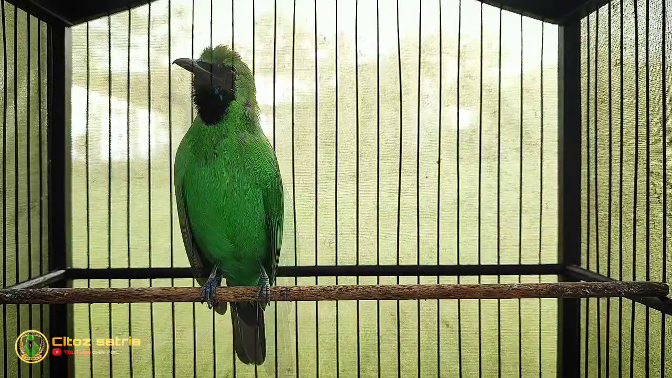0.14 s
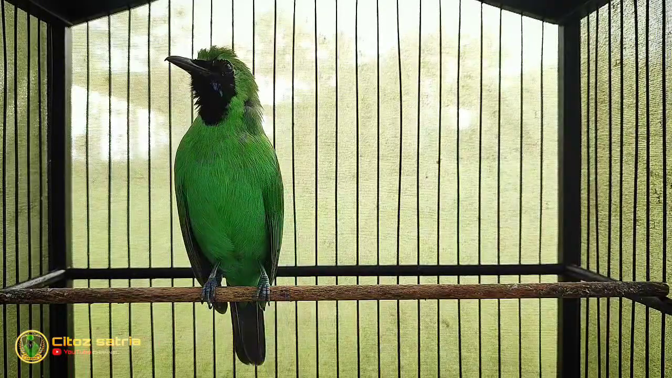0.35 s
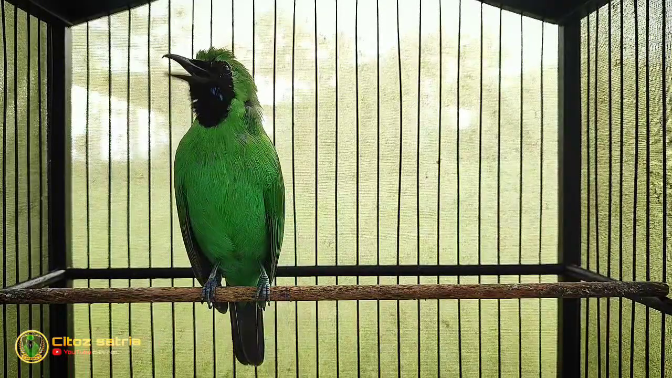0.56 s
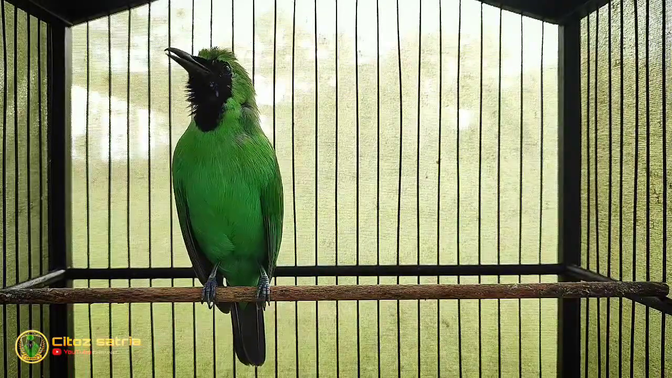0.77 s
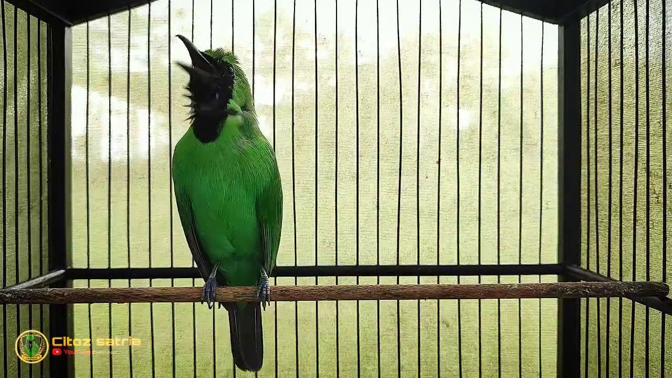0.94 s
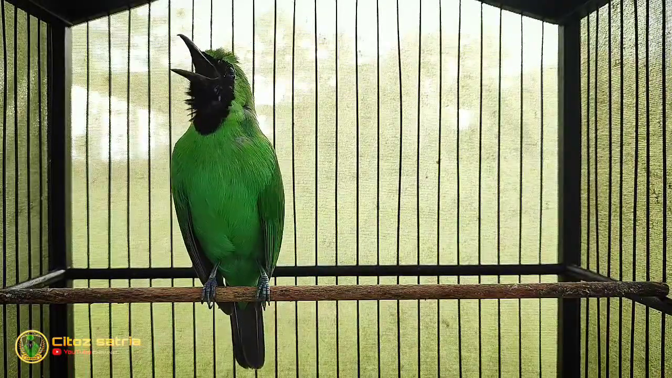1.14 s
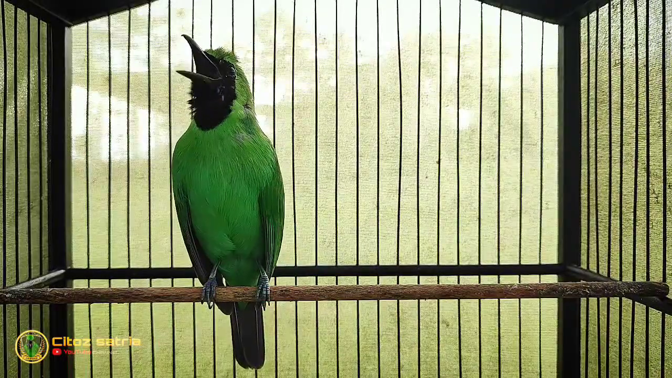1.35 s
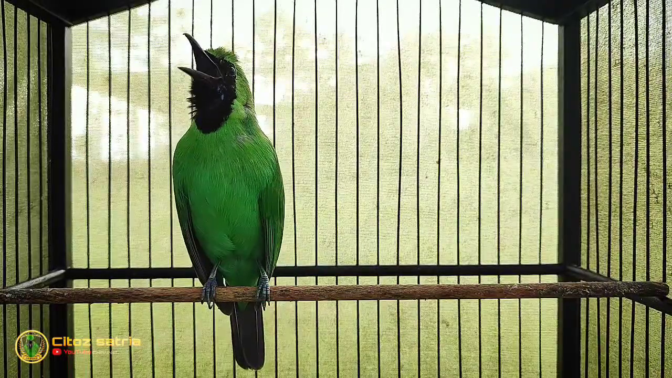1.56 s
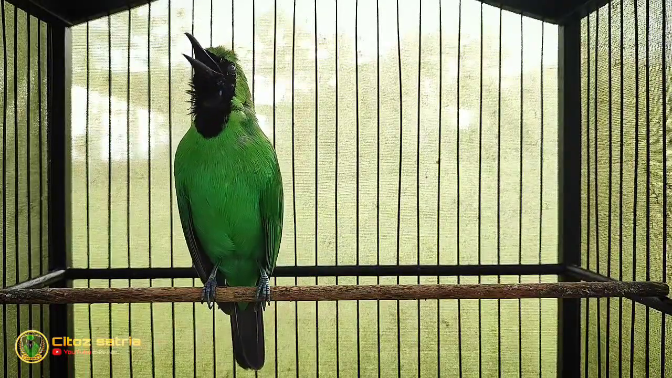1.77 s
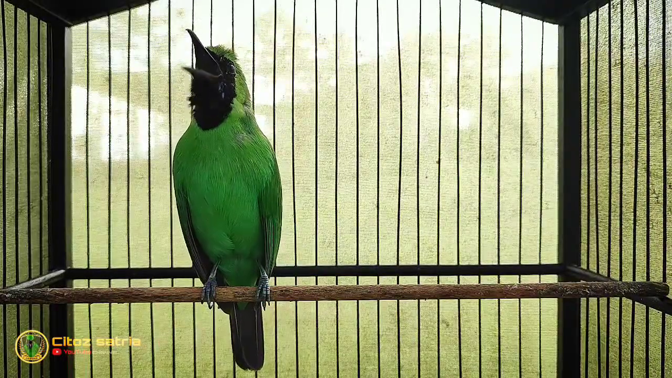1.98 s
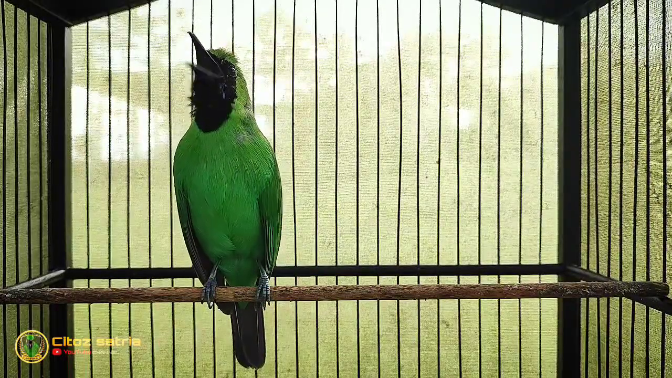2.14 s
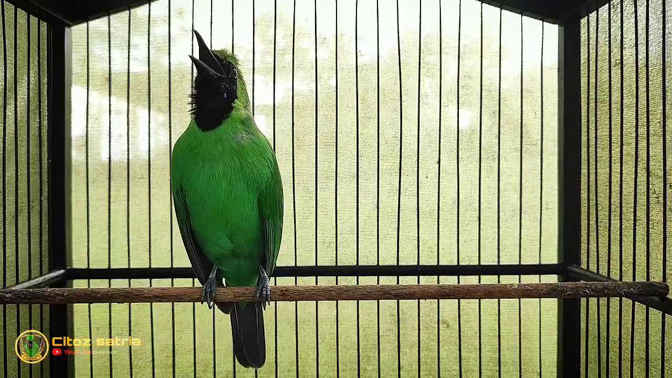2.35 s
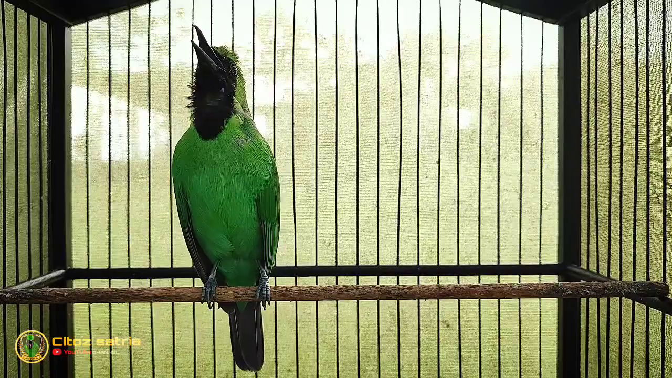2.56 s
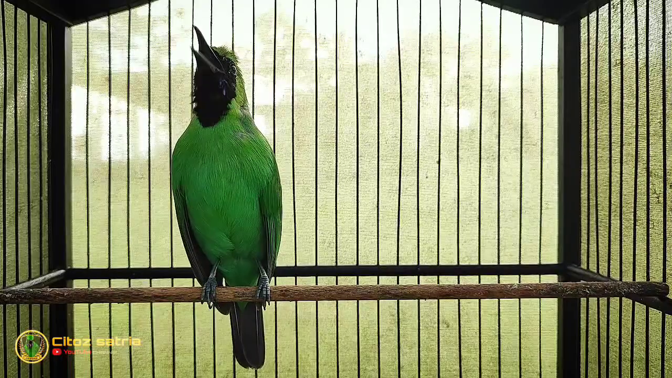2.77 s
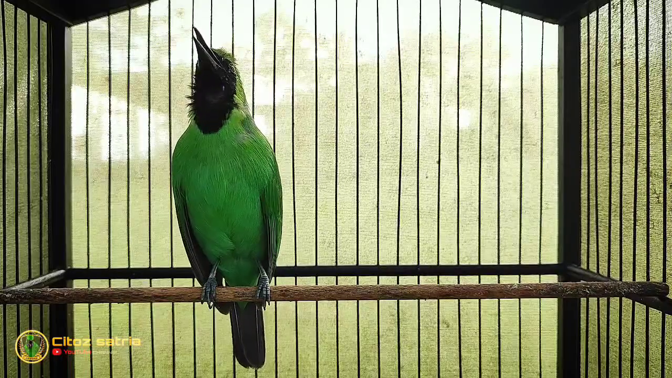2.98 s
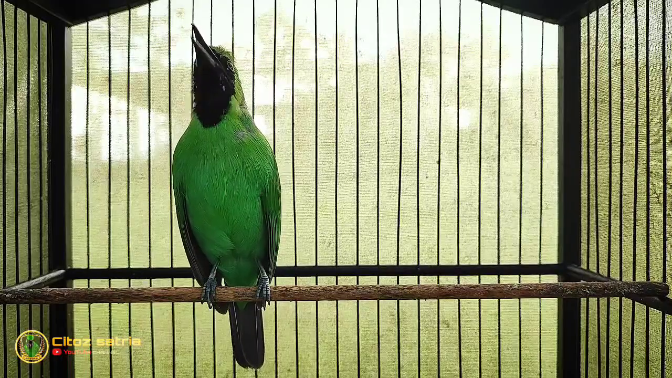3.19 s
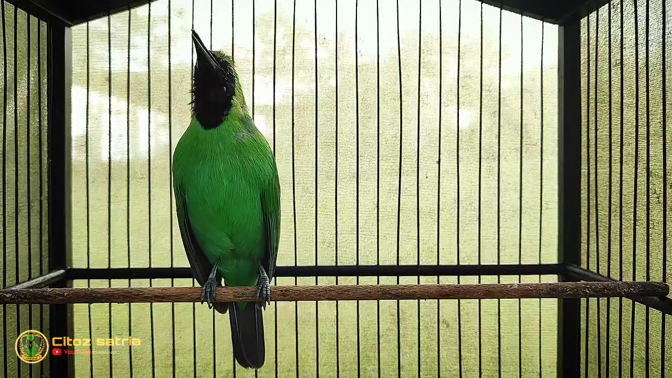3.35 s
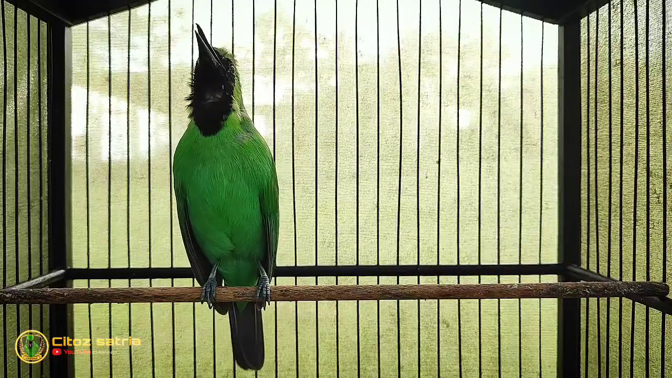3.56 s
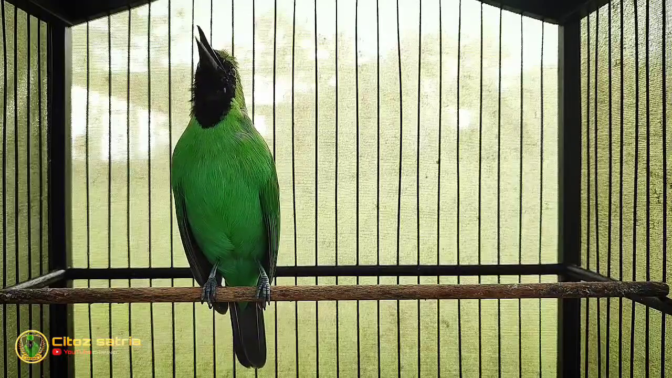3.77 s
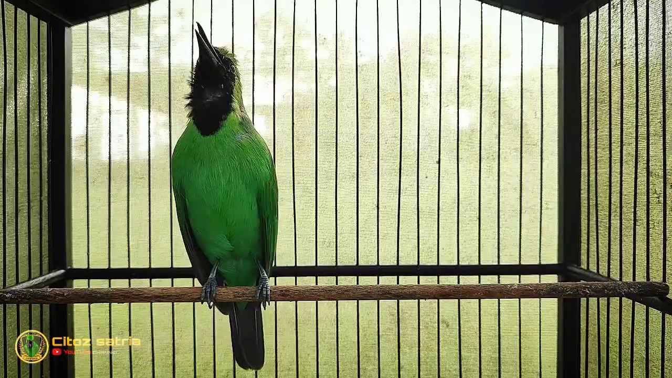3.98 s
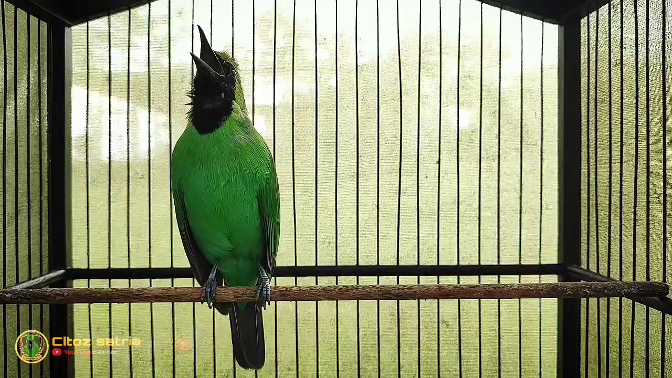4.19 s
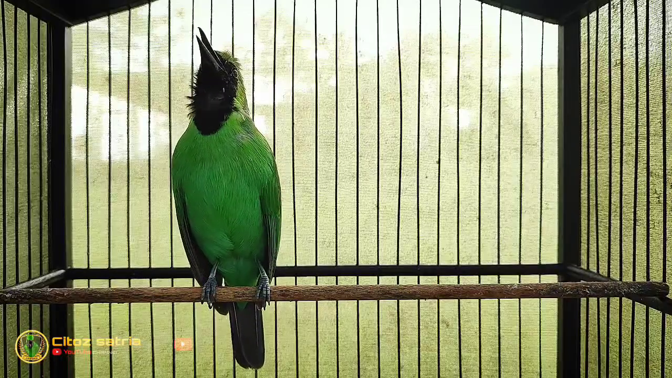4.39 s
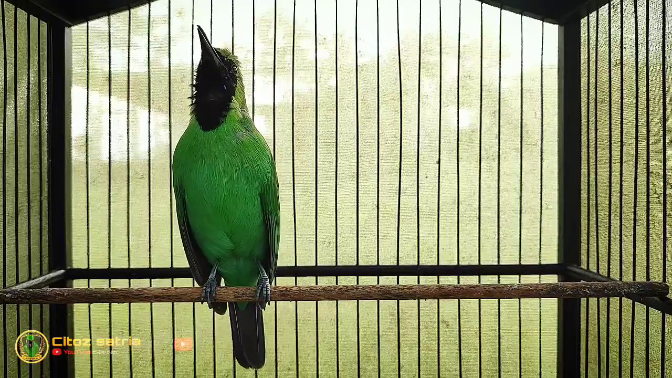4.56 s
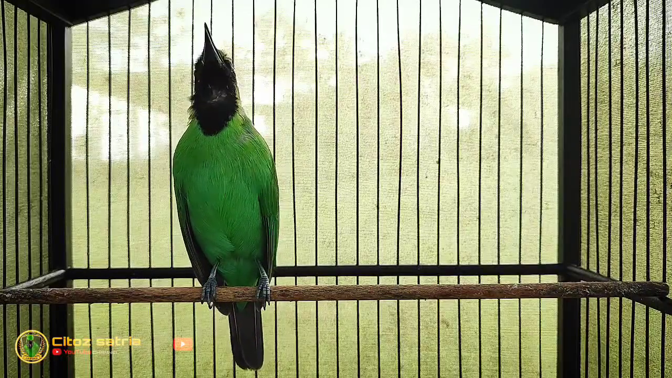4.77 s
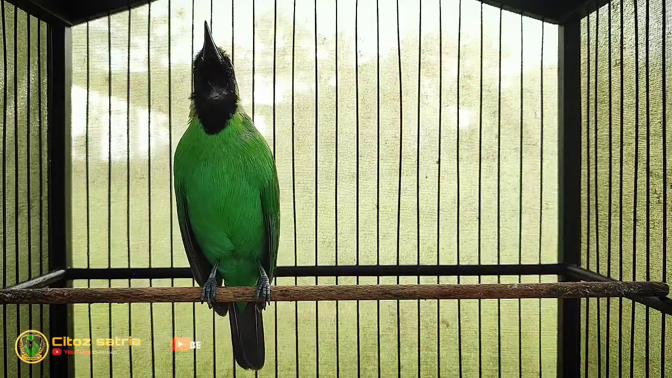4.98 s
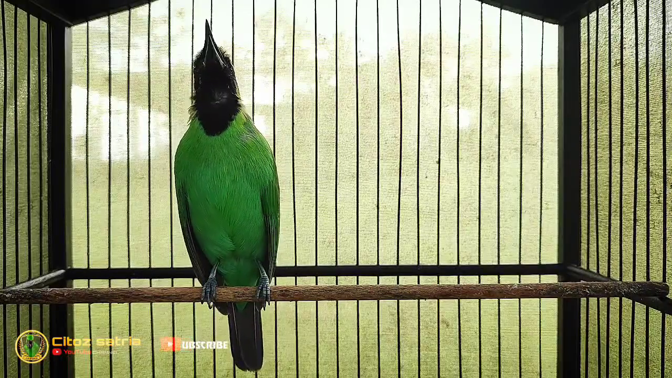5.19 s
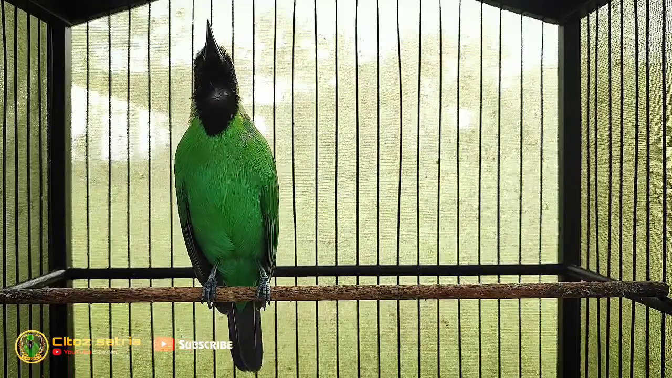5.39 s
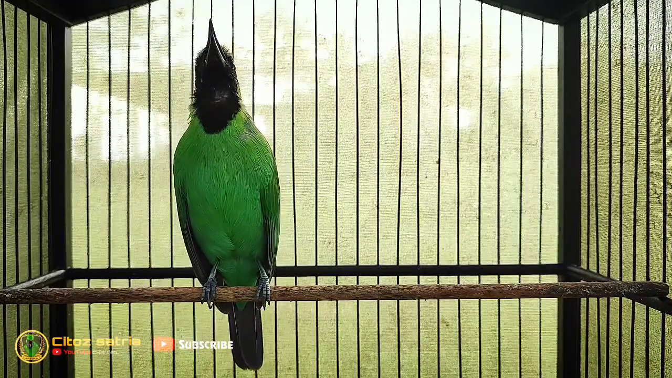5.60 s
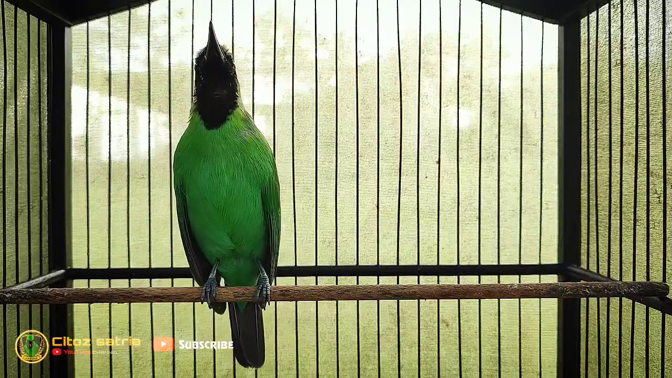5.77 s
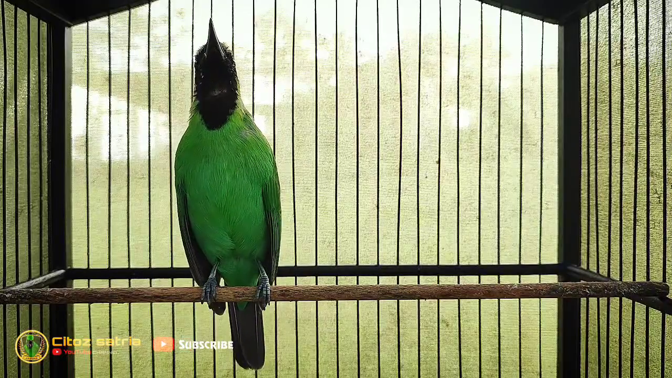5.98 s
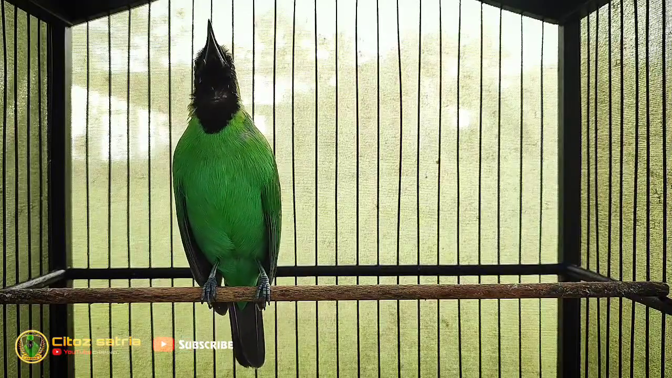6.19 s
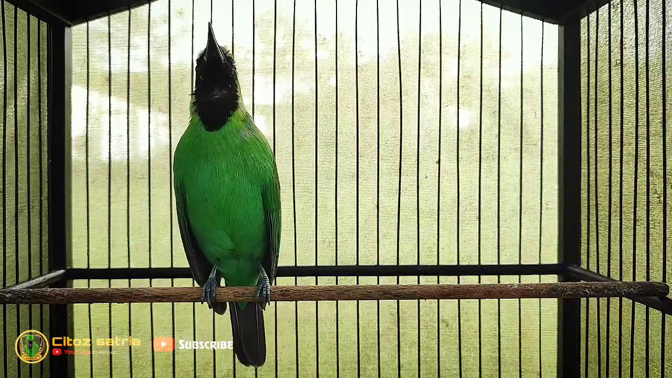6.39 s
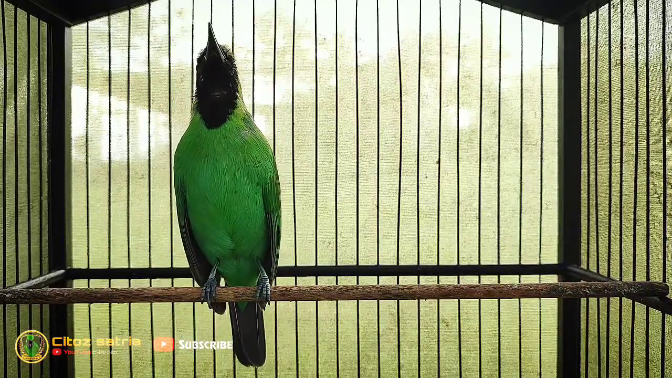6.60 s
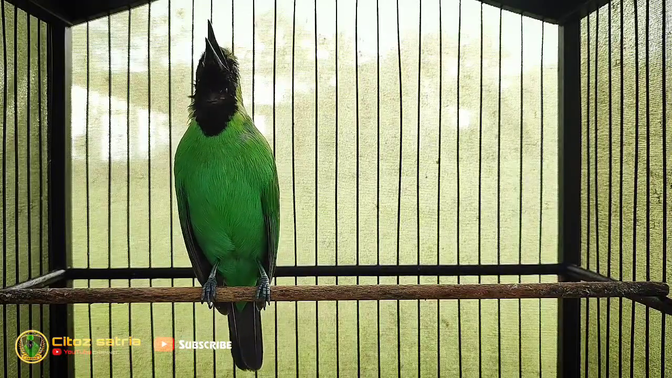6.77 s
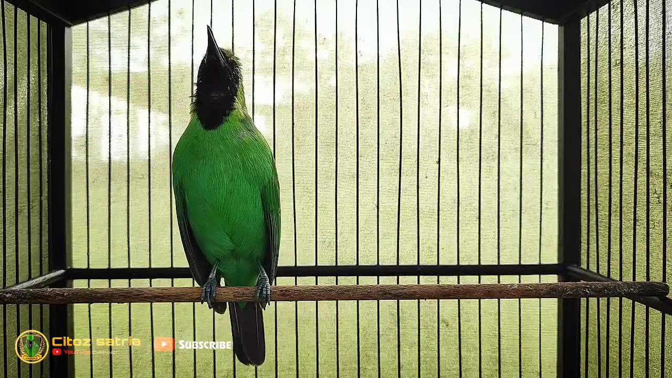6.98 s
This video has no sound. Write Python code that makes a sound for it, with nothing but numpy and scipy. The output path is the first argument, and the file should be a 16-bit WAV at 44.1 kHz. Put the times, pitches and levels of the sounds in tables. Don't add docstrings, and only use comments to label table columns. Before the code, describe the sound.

Far engine putter and soft hiss open the scene, with a faint distant bird peep. Then a close caged bird sings brightly and loudly, first fast raspy chirps in pairs, then slower, purer, gently bending whistles with clear gaps. The background dips under each note and swells back between them. Close phone-like pickup, slight stereo spread, dry yard, and a few peaks nearly overloading.

```python
import sys
import numpy as np
from scipy import signal
from scipy.fft import rfft, irfft
from scipy.io import wavfile
from scipy.ndimage import uniform_filter1d

SR = 44100
rng = np.random.default_rng(int(sys.argv[2]) if len(sys.argv) > 2 else 0)


def wrap_up_sound(samples):
    columns = np.atleast_2d(samples).T
    tamed = np.clip(columns, -1, 1)
    steps = np.round(tamed * 32767).astype(np.int16)
    wavfile.write(sys.argv[1], SR, steps)


def voltage_ratio(level):
    return 10 ** (np.asarray(level, float) / 20)


N = 310464
T = np.arange(N) / SR
HZ = np.fft.rfftfreq(N, 1 / SR)


def colour(x, points):
    hz, db = np.transpose(points)
    curve_db = np.interp(np.log(HZ + 1), np.log(hz), db)
    return irfft(rfft(x) * voltage_ratio(curve_db), N)


def unit(x):
    return x / np.sqrt(np.mean(x ** 2))


def wobble(lo_hz, hi_hz):
    band = signal.butter(2, [lo_hz, hi_hz], "band", fs=SR, output="sos")
    return unit(signal.sosfilt(band, rng.standard_normal(N)))


def ports(x):
    # f/Hz, left leads by phase/rad, left minus right level/dB
    port_gap = [(0, 1.1, -7), (300, 1.0, -1.3), (1600, 2.05, 1.1), (1930, 1.62, -3), (2150, 4.5, -10.5),
                (2400, 1.56, 10), (2750, 4.15, 0), (3050, 2.9, 6.2), (3450, 3.88, -6.6), (3850, 5.1, -0.2),
                (5300, 5.6, 1.5), (6770, 7.8, 8), (8380, 7.94, -12.5), (15700, 24, 11)]
    hz, lead_rad, pan_db = np.transpose(port_gap)
    left = voltage_ratio(np.interp(HZ, hz, pan_db) / 2) * np.exp(0.5j * np.interp(HZ, hz, lead_rad))
    even = np.sqrt(2 / (abs(left) ** 2 + abs(left) ** -2))
    return irfft(rfft(x) * even * np.array([left, 1 / left]), N)


def bird(duet_db=16, breath_db=-30, waver=0.049):
    # t/s, f/Hz, level/dB, flutter/0-1
    chirps = [
        [(0.612, 2836, -35.5, 0), (0.631, 3550, -9.5, 0.3), (0.647, 3930, -4, 0), (0.684, 4100, -6, 0.29),
         (0.699, 3560, -55, 0)],
        [(0.678, 3690, -50.5, 0.4), (0.687, 2883, -11, 0.24), (0.712, 3540, -1.5, 0), (0.725, 3600, -18, 0.48),
         (0.744, 3370, -39, 0.1)],
        [(0.835, 2317, -41, 0.1), (0.862, 3854, -6.5, 0.36), (0.886, 4430, -17.5, 0.07),
         (0.943, 4560, -7.5, 0.12), (0.98, 3600, -8.5, 0.25), (0.999, 2710, -6.5, 0.28),
         (1.014, 2570, -39, 0.1)],
        [(0.862, 2250, -66, 0.2), (0.872, 2150, -40, 0.4), (0.885, 2256, -9.5, 0), (0.913, 2500, -24.5, 0.1),
         (0.947, 2400, -30, 0.3)],
        [(1.145, 3030, -34.5, 0.2), (1.162, 3630, -9.5, 0.5), (1.176, 3910, -5.5, 0), (1.199, 3964, -2, 0.07),
         (1.225, 3820, -30, 0)],
        [(1.205, 3610, -50.5, 0.1), (1.212, 3690, -14.5, 0.35), (1.219, 2980, -1, 0.39),
         (1.248, 3550, -8, 0.05), (1.264, 3540, -58.5, 0.3)],
        [(1.362, 2680, -57.5, 0.3), (1.374, 3154, -6.5, 0.4), (1.383, 3706, -10, 0.2), (1.415, 3916, 1.5, 0.03),
         (1.439, 3866, -35, 0.16)],
        [(1.425, 3530, -34, 0), (1.435, 2860, -8, 0.27), (1.446, 3230, -6, 0.17), (1.472, 3414, -1, 0),
         (1.489, 3210, -32, 0.34)],
        [(1.566, 2700, -41, 0.4), (1.58, 3326, -7.5, 0.23), (1.608, 3890, -4, 0.07), (1.639, 3970, -6.5, 0.15),
         (1.649, 3850, -52.5, 0.4)],
        [(1.632, 3580, -65, 0.34), (1.639, 3190, -17.5, 0.66), (1.646, 3150, 1, 0.33), (1.68, 3540, -7, 0),
         (1.695, 3333, -46.5, 0.2)],
        [(1.772, 2720, -53.5, 0), (1.783, 2824, -9.5, 0.7), (1.806, 2950, -8.5, 0.07), (1.814, 2800, -6, 0.26),
         (1.824, 2720, -46, 0.4)],
        [(1.85, 2540, -51.5, 0.18), (1.861, 2850, -12, 0.5), (1.874, 2920, -5, 0.16), (1.887, 2950, -6.5, 0.2),
         (1.899, 2760, -38, 0.19)],
        [(1.926, 2569, -39.5, 0.12), (1.936, 2926, -4, 0.37), (1.95, 2982, 11, 0.01), (1.962, 2995, -15, 0.26),
         (1.972, 2880, -51.5, 0.21)],
        [(2.008, 2844, -50.5, 0.13), (2.017, 3316, -12, 0.42), (2.023, 2753, -41, 0.3), (2.03, 3450, -2, 0.1),
         (2.065, 3390, -45.5, 0.35)],
        [(2.012, 3564, -30.5, 0), (2.029, 3754, -12.5, 0.51), (2.043, 4140, -11.5, 0.5),
         (2.057, 3680, -22.5, 0.5), (2.068, 3960, -39.5, 0.18)],
        [(2.115, 4130, -44.5, 0.2), (2.133, 5024, -12, 0.24), (2.148, 5230, -11.5, 0.09),
         (2.183, 4640, -12.5, 0.13), (2.199, 4350, -47, 0.2)],
        [(2.118, 3524, -48, 0.3), (2.125, 3908, -28.5, 0.5), (2.131, 3270, -12.5, 0), (2.158, 3604, -17.5, 0.5),
         (2.2, 3280, -30, 0.3)],
        [(2.243, 3787, -42, 0), (2.258, 4520, -16.5, 0.2), (2.272, 5185, -9, 0.18), (2.299, 5030, -13.5, 0.23),
         (2.312, 4620, -11, 0.2), (2.331, 4000, -31.5, 0.07)],
        [(2.246, 3183, -58.5, 0), (2.257, 3910, -21, 0.3), (2.262, 3386, -20, 0.2), (2.282, 3940, -9, 0),
         (2.33, 3310, -31, 0.2)],
        [(2.385, 3060, -42, 0.2), (2.398, 3390, -16, 0.24), (2.405, 3490, -11, 0.33), (2.436, 3448, -6, 0),
         (2.484, 3073, -3.5, 0.06), (2.5, 2820, -49, 0.15)],
        [(2.575, 2260, -42.5, 0.2), (2.594, 2638, -9.5, 0.17), (2.646, 2344, -11.5, 0), (2.671, 2702, -3, 0),
         (2.692, 2487, -11, 0.3), (2.711, 2360, -10, 0), (2.737, 2238, -61, 0.12)],
        [(2.81, 2340, -42.5, 0.1), (2.82, 2790, -21, 0.5), (2.832, 2755, -23.5, 0.24),
         (2.848, 2910, -22.5, 0.26), (2.859, 2960, -60.5, 0.2)],
        [(2.815, 3540, -41.5, 0.03), (2.834, 3760, -10, 0), (2.846, 4000, -8, 0.18), (2.884, 3924, -4.5, 0),
         (2.919, 3790, -3.5, 0.11), (2.931, 3690, -53.5, 0)],
        [(3.01, 2152, -46.5, 0.09), (3.027, 2443, -13.5, 0.2), (3.063, 2378, -9.5, 0.03),
         (3.088, 2666, -1, 0.19), (3.111, 2646, -7, 0), (3.125, 2370, -56, 0.2)],
        [(3.125, 2150, -36.5, 0.4), (3.13, 2190, -19, 0.45), (3.137, 2220, -14, 0.28),
         (3.148, 2136, -12.5, 0.27), (3.16, 2100, -45, 0.05)],
        [(3.245, 2258, -30, 0.2), (3.295, 3260, -7, 0.1), (3.337, 3270, -10, 0.08), (3.359, 4050, -6, 0.33),
         (3.368, 3700, -16.5, 0), (3.377, 3880, -52.5, 0.1)],
        [(3.24, 3800, -31, 0.19), (3.28, 3966, -6, 0.26), (3.291, 3850, -20, 0), (3.301, 3730, -10, 0.17),
         (3.314, 3510, -58.5, 0.27)],
    ]
    # t/s, f/Hz, level/dB, flutter/0-1
    whistles = [
        [(3.452, 2015, -51, 0.04), (3.464, 2249, -12.5, 0.07), (3.472, 2342, -8.5, 0.11),
         (3.5, 2385, -10.5, 0.15), (3.552, 2860, -7.5, 0.04), (3.588, 2302, -7, 0.07), (3.615, 2153, -55, 0.11)],
        [(3.705, 2860, -38.5, 0.05), (3.723, 3760, -17, 0.18), (3.731, 3900, -12, 0.15), (3.75, 3993, -8, 0.03),
         (3.807, 3882, -3, 0.12), (3.825, 3740, -39, 0.11)],
        [(3.908, 2040, -42, 0.04), (3.928, 2402, -12.5, 0.03), (3.974, 2517, -8.5, 0.04),
         (4.021, 2172, -9.5, 0.13), (4.031, 2310, -6, 0.18), (4.041, 2260, -50.5, 0.16)],
        [(4.155, 2470, -50, 0.14), (4.179, 2776, -13, 0.07), (4.22, 3130, -19, 0.17),
         (4.235, 3083, -23.5, 0.57), (4.241, 3275, -47, 0.4)],
        [(4.16, 3116, -32.5, 0.04), (4.187, 4050, -11.5, 0.07), (4.203, 3950, -8.5, 0.14),
         (4.235, 3550, -8, 0.43), (4.259, 2990, -4.5, 0.15), (4.306, 3357, -5, 0.16),
         (4.325, 3144, -50.5, 0.02)],
        [(4.428, 1966, -40.5, 0.06), (4.447, 2331, -9.5, 0.03), (4.48, 2376, -9.5, 0.01),
         (4.541, 2124, -9, 0.17), (4.547, 2010, -12, 0.14), (4.557, 1930, -50, 0.05)],
        [(4.695, 2360, -45.5, 0.08), (4.721, 2831, -9.5, 0.08), (4.768, 2892, -5.5, 0.08),
         (4.815, 2288, -11, 0.12), (4.829, 2214, -10.5, 0.37), (4.841, 2240, -35.5, 0.17)],
        [(4.92, 1568, -56.5, 0.08), (4.933, 1770, -22.5, 0.06), (4.942, 1830, -18, 0.02),
         (4.974, 1943, -12, 0.01), (5.019, 1760, -7, 0.03), (5.044, 1580, -38, 0.11)],
        [(5.163, 2290, -58, 0.07), (5.172, 2440, -24.5, 0.08), (5.177, 2450, -14, 0.04),
         (5.248, 2750, -4.5, 0.02), (5.292, 2200, -12, 0.41), (5.307, 1950, -46, 0.07)],
        [(5.38, 1620, -41, 0.07), (5.406, 1887, -13.5, 0.15), (5.423, 1980, -9.5, 0.08),
         (5.437, 1948, -8.5, 0.02), (5.477, 1710, -10.5, 0.08), (5.498, 1526, -54.5, 0.05)],
        [(5.628, 2014, -51.5, 0.04), (5.64, 2316, -11, 0.05), (5.658, 2376, -10, 0.02),
         (5.718, 2569, -10.5, 0.2), (5.748, 2140, -7, 0.22), (5.772, 1890, -40.5, 0.02)],
        [(5.872, 1745, -54.5, 0.05), (5.888, 1941, -14.5, 0.03), (5.924, 1870, -10.5, 0.01),
         (5.97, 1724, -8.5, 0.03), (5.98, 1640, -17.5, 0.09), (5.995, 1420, -35, 0.13)],
        [(6.188, 2277, -52, 0.04), (6.202, 2380, -15.5, 0.16), (6.209, 2658, -13, 0.16),
         (6.235, 2539, -7.5, 0.22), (6.287, 2750, -6, 0.02), (6.332, 2269, -9, 0.18), (6.348, 2100, -50, 0.15)],
        [(6.456, 1560, -42, 0.19), (6.472, 1870, -17, 0.05), (6.499, 1953, -10.5, 0.01), (6.54, 1840, -9, 0.08),
         (6.555, 1674, -15.5, 0.1), (6.569, 1512, -50, 0.11)],
        [(6.72, 2250, -40, 0.07), (6.734, 2560, -16.5, 0.05), (6.773, 2512, -5.5, 0.02),
         (6.816, 2808, -7, 0.04), (6.85, 2333, -8.5, 0.08), (6.87, 2400, -10.5, 0.21), (6.885, 2058, -42, 0.15)],
    ]
    overtones_db = [-25.5, -26.5, -51.5, -27.5, -31, -47.5]
    # f/Hz, level/dB
    beak = [(900, -25), (2000, -10.5), (4500, -6.5), (6300, -13), (8500, 6), (11000, -2.5), (15500, -13)]

    voices, reach, loudest = np.zeros(N), np.zeros(N), np.zeros(N)
    beat, shake = wobble(63.0, 190.0), wobble(70.0, 250.0)
    for stroke in chirps + whistles:
        s, *columns = np.transpose(stroke)
        at = slice(int(s[0] * SR), int(s[-1] * SR))
        hz, db, flutter = (uniform_filter1d(np.interp(T[at], s, c), size=150) for c in columns)
        size = np.sqrt(2) * voltage_ratio(db) * abs(1 + 1.28 * flutter * beat[at])
        pitch_hz = hz * (1 + waver * flutter * shake[at])
        voices[at] += size * np.sin(2 * np.pi * np.cumsum(pitch_hz) / SR)
        reach[at] += size
        loudest[at] = np.maximum(loudest[at], size)

    duet = 2 * (1 - loudest / (reach + 1e-9))
    multiples = np.r_[0, 0, voltage_ratio(np.array(overtones_db))]
    bent = np.polynomial.chebyshev.chebval(voices / (reach + 1e-9), multiples)
    breath = voltage_ratio(breath_db) * rng.standard_normal(N)
    throat = reach * voltage_ratio(duet_db * np.sqrt(duet)) * (bent + breath)
    return voices + colour(throat, beak), reach


def yard(x, t60_s=0.45, wet_db=-30):
    t = T[:SR // 2]
    tails = rng.standard_normal((2, len(t))) * voltage_ratio(-60 * t / t60_s) * np.clip(t / 0.016, 0, 1)
    tails = tails / np.sqrt(np.sum(tails ** 2) / 2)
    return voltage_ratio(wet_db) * signal.fftconvolve(x[None], tails, axes=1)[:, :N]


def engine(scatter_db=5.0, ring_s=0.011):
    # t/s, firings per s, exhaust f/Hz, level/dB
    putter = [(0, 15.2, 116.1, -42), (1.2, 18.7, 115.2, -44), (2.4, 21, 115.2, -37.5),
              (3.599, 24, 110.2, -48), (4.599, 20, 149.7, -47.5), (5.8, 23.96, 140.8, -39.5),
              (7.04, 19.5, 160.6, -39)]
    # t/s, peak level/dB
    thumps = [(0.086, -43.5), (0.213, -42), (0.277, -46), (0.342, -30.5), (0.406, -42), (0.47, -32),
              (0.558, -26.5), (0.731, -42), (0.802, -31.5), (0.856, -23.5), (0.917, -28), (0.979, -29.5),
              (1.088, -23.5), (1.346, -23.5), (1.461, -41), (1.566, -25.5), (1.746, -41), (1.801, -29.5),
              (1.857, -26), (1.958, -27), (2.003, -33), (2.146, -24), (2.271, -34.5), (2.362, -32.5),
              (2.584, -25.5), (2.674, -20.5), (2.845, -30.5), (2.998, -32), (3.117, -38.5), (3.225, -26.5),
              (3.415, -37.5), (3.561, -29), (3.71, -29), (3.858, -43), (4.032, -29.5), (4.148, -35.5),
              (4.29, -36), (4.421, -35.5), (4.593, -34.5), (4.593, -39.5), (4.652, -35), (4.709, -35),
              (4.766, -29), (4.878, -37), (4.989, -30), (5.096, -35.5), (5.152, -41), (5.199, -32),
              (5.812, -46), (5.854, -44), (6.208, -44), (6.419, -36)]

    s, rate, exhaust_hz, db = np.transpose(putter)
    turns = np.cumsum(np.interp(T, s, rate) * (1 + 0.15 * wobble(3.0, 4.9))) / SR
    fired = np.flatnonzero(np.diff(np.floor(turns)))
    puffs = np.zeros(N)
    scatter = scatter_db * rng.standard_normal(len(fired))
    puffs[fired] = voltage_ratio(np.interp(T[fired], s, db) + 9.5 + scatter)
    for at_s, peak_db in thumps:
        puffs[int(at_s * SR)] += voltage_ratio(peak_db + 5.5)

    t = T[:4000]
    swell = signal.fftconvolve(puffs, t / ring_s * np.exp(1 - t / ring_s))[:N]
    swell += voltage_ratio(np.interp(T, s, db) + 4.5) * abs(wobble(1.6, 28.0))
    pitch_hz = np.interp(T, s, exhaust_hz) * (1 + 0.19 * wobble(4.5, 37.0))
    phase = 2 * np.pi * np.cumsum(pitch_hz) / SR
    tone = np.sin(phase) + voltage_ratio(-11) * np.sin(1.7 * phase)
    return swell * (tone + voltage_ratio(-25.5) * wobble(140.0, 420.0))


def outdoors(hiss_db=-46):
    # f/Hz, level/dB per Hz
    air = [(150, -39.5), (250, -9.5), (717, -17.5), (809, -18), (2320, -21), (2800, -16), (3390, -23.5),
           (8610, -24.5), (15500, -43.5)]
    # start t/s, end t/s, f/Hz, level/dB
    far_notes = [(.06, 0.156, 3110, -52), (.34, .47, 2910, -40), (1.016, 1.102, 613, -41),
                 (5.538, 5.581, 3160, -39)]

    hiss = np.array([unit(colour(rng.standard_normal(N), air)) for _ in range(2)])
    notes = np.zeros(N)
    for start_s, end_s, hz, db in far_notes:
        rise_fall = np.sin(np.pi * np.clip((T - start_s) / (end_s - start_s), 0, 1))
        notes += voltage_ratio(db) * rise_fall * np.sin(2 * np.pi * hz * T)
    return voltage_ratio(hiss_db + 2.6 * wobble(0.5, 2.9)) * hiss + ports(notes)


def scene(release_s=0.04, knee_db=-30):
    song, reach = bird()
    hold = np.exp(-1 / (release_s * SR))
    loudness = signal.lfilter([1 - hold], [1, -hold], reach)
    gain = 1 / (1 + loudness / voltage_ratio(knee_db)) ** 0.27
    background = yard(song) + outdoors() + ports(engine())
    return ports(song) + gain * background


def roll_off(x):
    return signal.sosfilt(signal.butter(12, 15630, fs=SR, output="sos"), x)


def record(dry):
    return roll_off(np.clip(dry, -1, 1))


dry = scene()
out = record(dry)
wrap_up_sound(out)
```